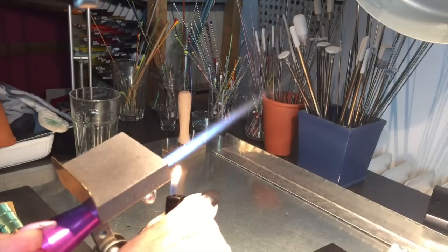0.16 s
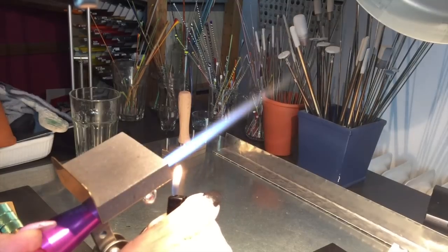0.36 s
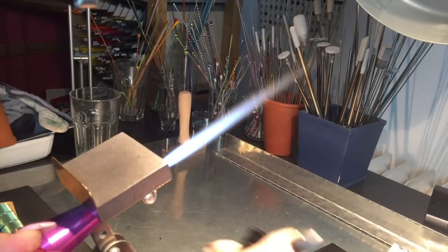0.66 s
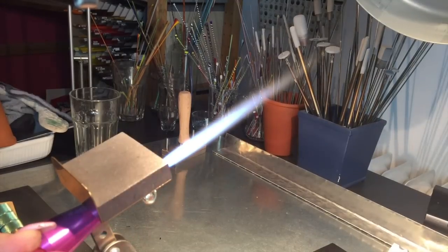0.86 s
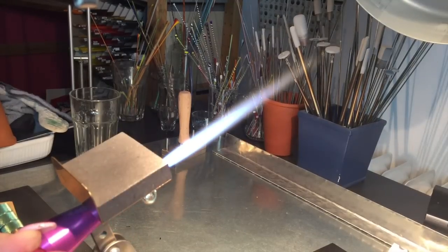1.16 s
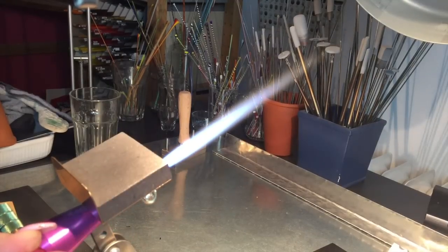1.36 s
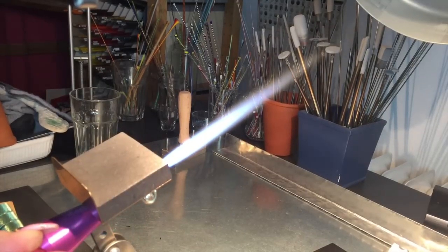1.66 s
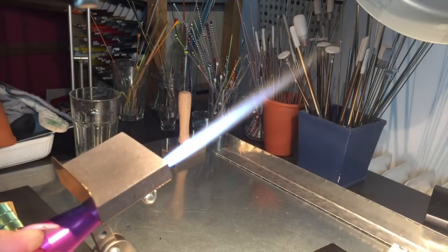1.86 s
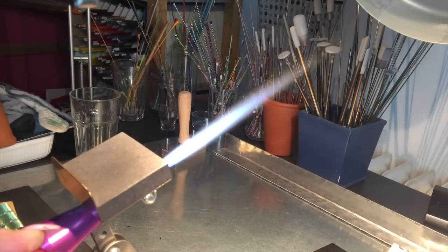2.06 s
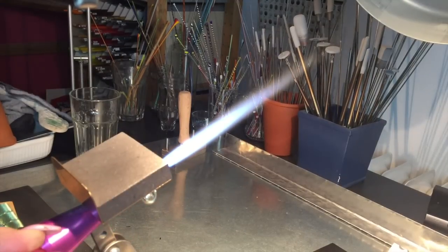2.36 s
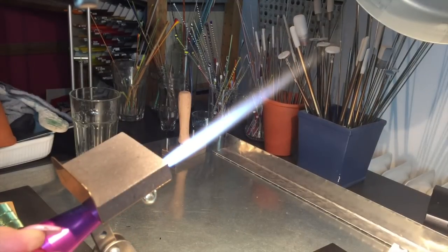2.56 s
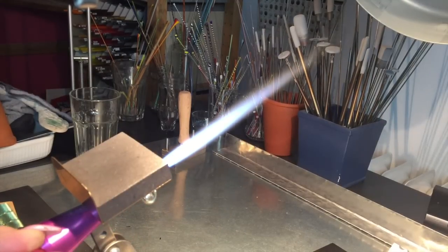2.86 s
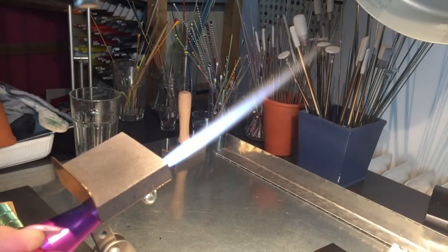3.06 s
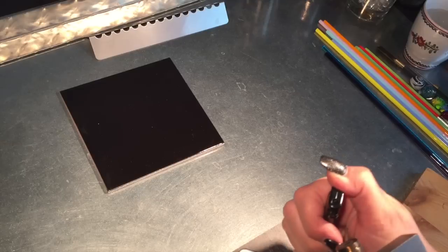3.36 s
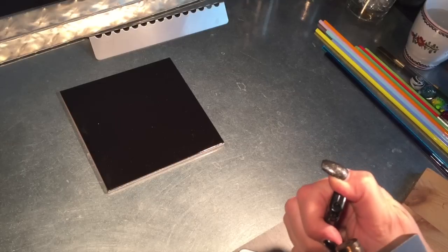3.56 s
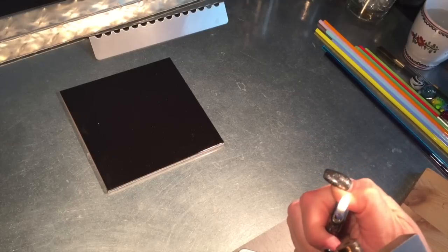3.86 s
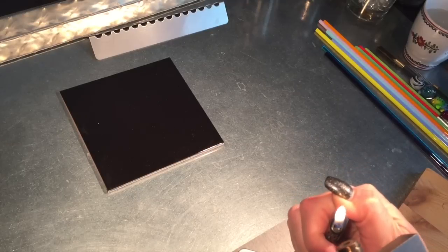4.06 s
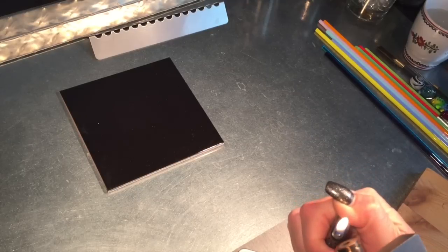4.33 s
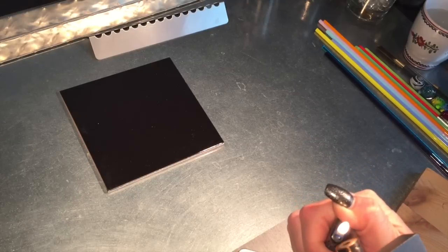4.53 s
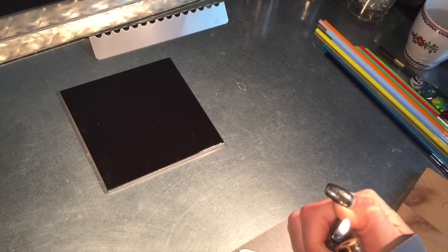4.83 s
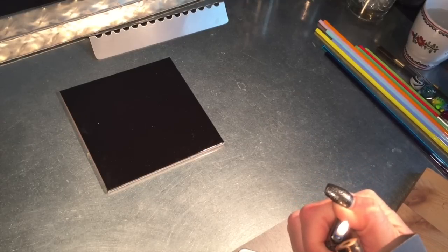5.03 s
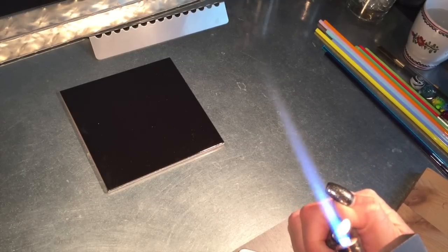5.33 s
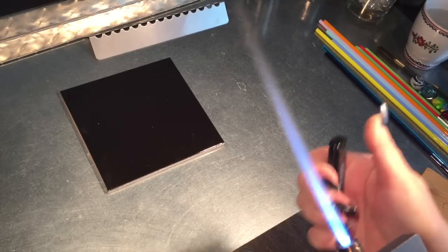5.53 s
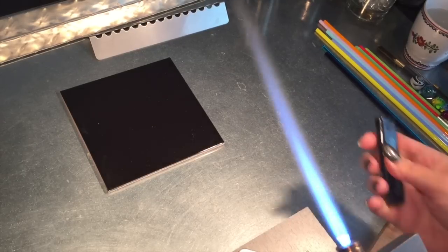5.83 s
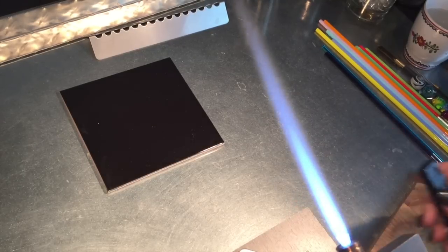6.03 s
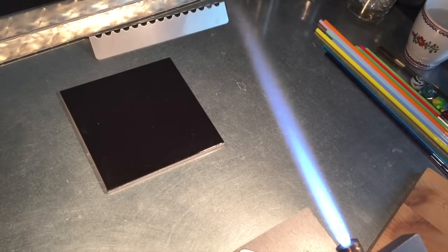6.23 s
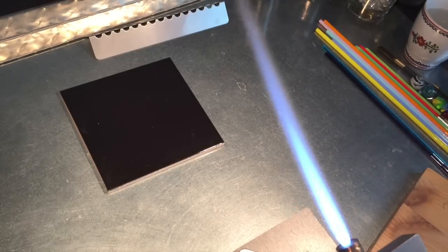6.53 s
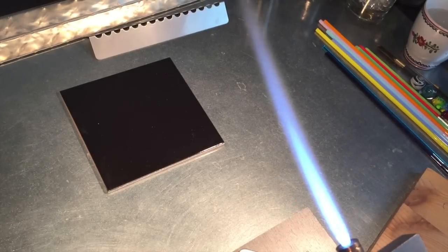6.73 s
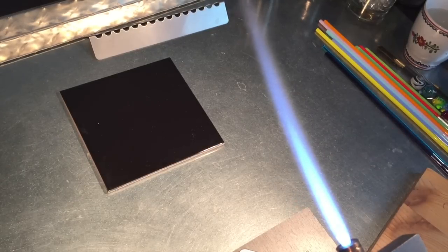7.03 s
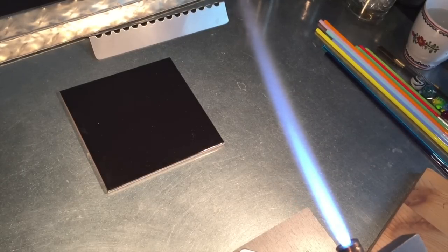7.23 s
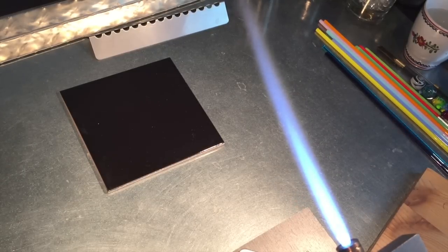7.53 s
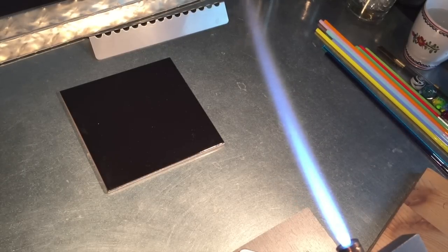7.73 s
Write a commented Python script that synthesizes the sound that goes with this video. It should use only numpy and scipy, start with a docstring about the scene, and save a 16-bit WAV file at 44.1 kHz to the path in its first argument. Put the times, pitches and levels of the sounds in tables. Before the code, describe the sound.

A gas torch catches with a short pop and burns with a quiet rush beside a workbench, an extractor fan humming throughout. The sound suddenly gets louder, heard from above the bench, with a thin hiss of gas. A pocket lighter snaps sharply, then the torch pops alight again and its rush grows. The volume dips after both noises and creeps back. The lighter scrapes briefly and clatters onto the metal bench.

```python
"""A bench gas torch is lit twice: its hissing jet catches with a pop and burns with a growing rush.
An extractor fan hums and blows throughout. The first lighting is heard quietly from beside the bench,
the second from above it. There a pocket lighter snaps, the torch pops alight, and the lighter slides
onto the metal bench and drops flat. In this second scene an automatic volume control turns the sound
down after each sharp noise and lets it creep back."""
import sys
import numpy as np
from scipy import signal
from scipy.fft import rfft, irfft, next_fast_len
from scipy.io import wavfile
from scipy.ndimage import uniform_filter1d, minimum_filter1d

SR = 44100
rng = np.random.default_rng(int(sys.argv[2]) if len(sys.argv) > 2 else 0)


def unload_wav(signal):
    """Save mono or channel-first audio to the path in sys.argv[1] as 16-bit WAV at rate SR, clipped to [-1, 1]."""
    wavfile.write(
        sys.argv[1],
        SR,
        np.round(np.clip(np.atleast_2d(signal).T, -1, 1) * 32767).astype(np.int16),
    )


N = 347799
TIME = np.arange(N) / SR
FFT_SIZE = next_fast_len(N, True)
FREQS = np.fft.rfftfreq(FFT_SIZE, 1 / SR)
SECOND_SCENE_S = 3.309  # from here on we listen from above the bench

# The two times the gas catches. Each row: start in seconds, energy in dB, treble tilt in dB per octave,
# the flame's run-up in seconds, run-up and echo levels in dB against the pop, then a dip in the echo:
# its pitch in Hz, width in Hz and depth in dB.
IGNITIONS = [(.1034, 30.5, 0, 0.0043, -25, -10.5, 7600, 600, -19.5),
             (5.2996, 33, 0.5, .0062, -21, -13, 6500, 1800, -12.5)]
# The lighter knocks on the bench. Each row: start in seconds, energy in dB, treble tilt in dB per
# octave, rattle time in seconds.
BENCH_KNOCKS = [(7.118, -7, 11, 0.0055), (7.128, 5, -4, 0.0046), (7.135, -4.5, 2.5, 0.0086)]
# The tone of the metal bench. Each row: frequency in Hz, relative level in dB.
BENCH_TONE = [(100, -30), (600, 0), (1100, -2), (1850, 4), (2300, -11), (3100, -3.5), (4300, -11),
              (5300, -13.5), (6400, -14), (7300, -18.5), (8500, -15), (11000, -22.5), (13000, -20),
              (16000, -35)]


def amp(db):
    """Turns decibels into a gain."""
    return 10 ** (np.asarray(db) / 20)


def unit(x):
    """Scales a sound to an energy of 1."""
    return x / np.sqrt(np.sum(x ** 2) + 1e-20)


def curve_at(points, hz):
    """Reads between the rows of a frequency table, on a scale of octaves."""
    row_hz, value = np.transpose(points)
    return np.interp(np.log(hz + 1), np.log(row_hz + 1), value)


def add(mix, start_s, sound):
    """Mixes a sound in at its start time."""
    part = mix[round(start_s * SR):][:len(sound)]
    part += sound[:len(part)]


def noise(db, ripple_db=1):
    """Noise with the given spectrum in dB per Hz; the room's reflections put ripples in its treble."""
    ripple = unit(uniform_filter1d(rng.standard_normal(len(FREQS)), size=350)) * np.sqrt(len(FREQS))
    treble_db = ripple_db * ripple * np.clip(FREQS / 2000 - .5, 0, 1)
    spectrum = rfft(rng.standard_normal(FFT_SIZE)) * amp(db + treble_db)
    return irfft(spectrum, FFT_SIZE)[:N] * np.sqrt(SR / 2)


def band(hz, width_hz):
    """Narrow noise with an average power of 1; around 0 Hz it is a random drift."""
    shape = 1 / (1 + (2 * (FREQS - hz) / width_hz) ** 2)
    return unit(irfft(rfft(rng.standard_normal(FFT_SIZE)) * shape, FFT_SIZE)[:N]) * np.sqrt(N)


def colour(x, tone, tilt_db, size=2048):
    """Gives a sound the tone of an object, tilted by tilt_db per octave above 1500 Hz."""
    hz = abs(np.fft.fftfreq(size, 1 / SR))
    log_gain = np.log(amp(curve_at(tone, hz) + tilt_db * np.log2(np.maximum(hz, 1500))))
    ring = np.fft.ifft(np.exp(np.conj(signal.hilbert(log_gain)))).real  # rings only after the hit
    return signal.fftconvolve(x, unit(ring[:size // 2]))


def hit(rattle_s, rattle_share):
    """One sharp push and a quickly dying rattle, which share an energy of 1."""
    t = np.arange(SR // 20) / SR
    push = np.sqrt(rattle_share) * unit(rng.standard_normal(len(t)) * np.exp(-t / rattle_s))
    push[0] = np.sqrt(1 - rattle_share)
    return push


def hollow(x, hz, width_hz, db):
    """Carves one dip into a sound's spectrum."""
    freqs = np.fft.rfftfreq(len(x), 1 / SR)
    return irfft(rfft(x) * amp(db * np.exp(-2 * ((freqs - hz) / width_hz) ** 2)), len(x))


def second_scene(fade_s=0.016):
    """Goes from 0 beside the bench to 1 above it."""
    return np.clip((TIME - SECOND_SCENE_S) / fade_s + .5, 0, 1)


def echo(x, build_s=0.00158):
    """The workshop's wash of reflections, whose highest treble dies first."""
    # How long the room rings. Each row: frequency in Hz, seconds to fade by 60 dB.
    fade_times = [(100, 0.28), (800, .38), (2000, 0.5), (4000, 0.41), (6000, 0.35), (10000, 0.29),
                  (16000, 0.19)]
    hz, t, spectra = signal.stft(rng.standard_normal(SR * 3 // 5), SR, nperseg=256)
    fade = amp(-60 * t / curve_at(fade_times, hz)[:, None])
    tail = signal.istft(spectra * fade, SR, nperseg=256)[1]
    build_up = 1 - np.exp(-np.arange(len(tail)) / SR / build_s)
    return signal.fftconvolve(x, unit(tail * build_up))


def with_echo(x, echo_db):
    """A sound together with its echo."""
    out = amp(echo_db) * echo(x)
    add(out, 0, x)
    return out


def hit_echo(tone, tilt_db):
    """The room hears a hit from all sides, so its echo has only the object's smooth tone; energy 1."""
    return unit(echo(colour(np.ones(1), tone, tilt_db)))


def resonances_db():
    """Standing waves in the duct and room lift some frequencies and weaken others."""
    # The peaks and dips. Each row: frequency in Hz, width in Hz, height in dB.
    peaks = [(121.7, 15.3, 8.5), (149.5, 9.2, -7), (161.4, 17, 2.5), (200.5, 6.1, 5), (251, 26.2, 10),
             (298, 21, -2), (355.8, 19.5, 5.5), (396, 16, 2), (459.4, 28, 8), (490, 18, -4.5), (547, 43, 4),
             (641.4, 70, 6.5), (868, 17, 7.5), (970, 63, -0.5), (1330, 40, 3), (1454, 52, -2.5),
             (1472, 17, 11), (1617, 22, 5.5), (2000, 27, 0), (2190, 50, 2.5), (2340, 43, 6),
             (2380, 45, -14), (2630, 50, -10.5), (2694, 41, 13), (3150, 34, 6.5), (3320, 54, -9.5),
             (3770, 80, 7), (4350, 100, 9.5)]
    return sum(db * np.exp(-2 * ((FREQS - hz) / width) ** 2) for hz, width, db in peaks)


def fan(waver_hz=1.48, flutter=0.33, swell_db=.5):
    """Swirling air rumbles in the extractor's duct while the motor hums in wavering tones."""
    # The air's rumble beside and above the bench. Each row: frequency in Hz, base level in dB per Hz.
    rumble_beside = [(20, -94.5), (45, -71.5), (65, -65), (120, -58), (200, -53.5), (255, -58.5),
                     (305, -52), (365, -60.5), (410, -71), (520, -84.5), (830, -64.5), (1200, -78.5),
                     (1800, -72), (2400, -88), (6000, -115)]
    rumble_above = [(20, -82), (48, -71.5), (68, -61.5), (110, -57), (210, -56), (310, -60), (500, -69),
                    (680, -66.5), (950, -76.5), (1180, -70), (1420, -79), (1780, -72), (2000, -84),
                    (6000, -112)]
    # The motor's hum. Each row: pitch in Hz, level in dB beside the bench, level in dB above it.
    motor_tones = [(121.8, -50, -65), (361.2, -65.5, -50), (670.4, -58, -48.5), (1633, -59, -53),
                   (1740, -55.5, -51), (1820, -51, -59)]
    duct_db, above = resonances_db(), second_scene()
    air = (1 - above) * noise(curve_at(rumble_beside, FREQS) + duct_db)
    air += above * noise(curve_at(rumble_above, FREQS) + duct_db)
    out = air * amp(swell_db * band(0, 22))
    for hz, beside_db, above_db in motor_tones:
        level = ((1 - above) * amp(beside_db) + above * amp(above_db)) * (1 + flutter * band(0, 38))
        phase = 2 * np.pi * np.cumsum(hz + waver_hz * band(0, 5.94)) / SR
        out += np.sqrt(2) * level * np.sin(phase)
    return out


def metal_rings():
    """Metal rings on after the first pop and after the lighter's snap, touch on the bench and fall."""
    # The dying tones. Each row: start in seconds, pitch in Hz, peak in dB, seconds to fade by 60 dB.
    tones = [(0.105, 1435, -15.5, 0.3), (3.752, 5652, -29.5, 0.34), (3.752, 8250, -29, .25),
             (6.92, 4300, -31.5, 0.012), (7.128, 1856, -29, 0.51), (7.127, 3500, -33, .07)]
    out, t = np.zeros(N), np.arange(SR // 3) / SR
    for start_s, hz, db, fade_s in tones:
        add(out, start_s, amp(db - 60 * t / fade_s) * np.sin(2 * np.pi * hz * t))
    return out


def lighter_drag(start_s=6.972, swell_s=0.01, stop_s=0.029, level_db=-39, clump_db=3, slips_per_s=1800):
    """The lighter skips over the sheet metal in clumps of tiny rasping slips, until the last knock."""
    # Resonances the dragging stirs. Each row: pitch in Hz, width in Hz, level in dB against the drag.
    rasp_bands = [(4330, 1000, -15.5), (6250, 700, -21), (8300, 300, -26), (12750, 1000, -25)]
    speed = np.clip((TIME - start_s) / swell_s, 0, 1)
    speed *= np.clip(1 - (TIME - BENCH_KNOCKS[-1][0]) / stop_s, 0, 1)
    force = amp(level_db + clump_db * band(0, 160)) * speed
    slips = unit(rng.standard_normal(N) * (rng.random(N) < slips_per_s / SR)) * np.sqrt(N)
    rasp = sum(amp(db) * band(hz, width) for hz, width, db in rasp_bands)
    scrape = colour(slips * force, BENCH_TONE, tilt_db=-3.5)[:N]
    return with_echo(scrape + rasp * force, echo_db=-4)[:N]


def lighter_fall(echo_db=-4):
    """The lighter falls on its side and bounces on the sheet metal."""
    out = np.zeros(N)
    for start_s, db, tilt_db, rattle_s in BENCH_KNOCKS:
        knock = colour(hit(rattle_s, rattle_share=0.78), BENCH_TONE, tilt_db)
        add(out, start_s, amp(db) * unit(knock))
        add(out, start_s, amp(db + echo_db) * hit_echo(BENCH_TONE, tilt_db))
    return out


def lighter_in_hand():
    """Snaps and finger rubs make the lighter's small plastic body ring."""
    # The tone of that body. Each row: frequency in Hz, relative level in dB.
    plastic_tone = [(100, -10), (600, -3), (1200, -6), (1900, -3.5), (2900, 7.5), (3600, -2), (4300, 0),
                    (5100, 0), (5700, 5), (6800, -2), (10000, -7), (11700, -4.5), (13000, -10.5),
                    (16000, -9.5)]
    # The lighter snaps, is let go and is handled. Each row: start in seconds, energy in dB, treble tilt
    # in dB per octave, rattle time in seconds, echo level in dB against the click.
    clicks = [(3.7476, -17, 3, .0005, -12), (3.7509, 32, 5.5, 0.0013, -18.5), (5.515, -14, -8, 0.0024, 0),
              (5.5374, -8, -1, 0.004, -8), (5.988, -21.5, -1, .006, -6), (6.135, -25, 4, .003, -6)]
    # Finger rubs. Each row: start and length in seconds, level in dB, treble tilt in dB per octave.
    rubs = [(3.519, 0.015, -41, 9), (3.722, 0.016, -47, 2), (6.384, 0.014, -50, 0),
            (6.552, 0.024, -47.5, 9), (6.652, .016, -56, 4), (6.736, 0.025, -55, 4),
            (6.91, 0.022, -48, -10)]
    out = np.zeros(N)
    for start_s, db, tilt_db, rattle_s, echo_db in clicks:
        click = colour(hit(rattle_s, rattle_share=0.86), plastic_tone, tilt_db)
        add(out, start_s, amp(db) * unit(click))
        add(out, start_s, amp(db + echo_db) * hit_echo(plastic_tone, tilt_db))
    for start_s, length_s, db, tilt_db in rubs:
        count = round(length_s * SR)
        grains = rng.standard_normal(count) * rng.exponential(1, count) * signal.windows.tukey(count, .4)
        rub = colour(unit(grains), plastic_tone, tilt_db)
        add(out, start_s, amp(db) * np.sqrt(count) * with_echo(rub, echo_db=-6.5))
    return out


def lighter_puff(start_s=3.7535, hz=78, db=-1, decay_s=0.0067):
    """The lighter's own gas catches with a short low thump."""
    out, t = np.zeros(N), np.arange(SR // 8) / SR
    add(out, start_s, -amp(db) * np.sin(2 * np.pi * hz * t) * np.exp(-t / decay_s))
    return out


def burning(lit_s, catch_s=.04):
    """Rises to 1 as a flame takes hold and stays there until its scene ends."""
    in_scene = second_scene() if lit_s > SECOND_SCENE_S else 1 - second_scene()
    return in_scene * np.clip((TIME - lit_s) / catch_s, 0, 1)


def gas_jet(beside_db=-75, above_db=-62, lit_db=-4, flicker_db=2, whine_hz=14260, whine_db=-74.5):
    """The jet hisses and whistles on the nozzle's edge; the whistles are louder above, softer when lit."""
    # The hiss of escaping gas. Each row: frequency in Hz, level in dB per Hz.
    hiss = [(500, -100), (2000, -88.5), (2700, -84), (3800, -91), (5000, -99), (6200, -99), (7600, -103),
            (8300, -95), (9200, -102), (10500, -106), (11000, -103), (11600, -105), (16000, -107)]
    # The nozzle's unsteady whistles. Each row: pitch in Hz, width in Hz, relative level in dB.
    edge_tones = [(9887, 260, 1.5), (8380, 220, -9.5)]
    above, lit = second_scene(), [burning(lit_s) for lit_s, *_ in IGNITIONS]
    whistle_db = (1 - above) * beside_db + above * above_db + lit_db * sum(lit)
    whistles = sum(amp(db) * band(hz, width) for hz, width, db in edge_tones)
    whistles *= amp(whistle_db + flicker_db * band(0, 25))
    whine_phase = 2 * np.pi * np.cumsum(whine_hz + 12 * band(0, 20)) / SR  # wavers by about 12 Hz
    whine = amp(whine_db) * np.sqrt(2) * np.sin(whine_phase)
    whine *= 1 - lit[-1]  # the last lighting stops the jet's thin whine
    return noise(curve_at(hiss, FREQS)) + whistles + whine


def torch_pops(bounce_s=0.004, bounce_db=-13):
    """The flame runs up to the nozzle and bursts; the bench top and the room throw the crack back."""
    # The tones of the pop and of its run-up. Each row: frequency in Hz, relative level in dB.
    pop_tone = [(25, -52.5), (90, -3), (330, -3.5), (500, -6.5), (780, -0.5), (1050, -5), (1550, 0),
                (2100, -10.5), (3000, -8.5), (4300, -8), (5150, -18.5), (6300, -16), (8800, -17.5),
                (11000, -26.5)]
    run_up_tone = [(300, -12.0), (1500, -1.5), (8000, -24.0)]
    out = np.zeros(N)
    for start_s, db, tilt_db, run_s, run_db, echo_db, dip_hz, dip_width_hz, dip_db in IGNITIONS:
        push = np.zeros(SR // 10)
        count = round(run_s * SR)
        run_up = rng.standard_normal(count) * np.linspace(.3, 1, count) ** 2
        add(push, 0, amp(run_db) * unit(colour(run_up, run_up_tone, tilt_db=0)))
        burst = hit(rattle_s=0.001, rattle_share=0.35)
        add(push, run_s, burst + amp(-6.5) * hit(rattle_s=0.0044, rattle_share=0.89))
        add(push, run_s + bounce_s, amp(bounce_db) * burst)
        add(out, start_s - run_s, amp(db) * unit(colour(push, pop_tone, tilt_db)))
        tail = hollow(hit_echo(pop_tone, tilt_db), dip_hz, dip_width_hz, dip_db)
        add(out, start_s, amp(db + echo_db) * tail)
    return out


def flame_strength():
    """Each flame catches at its pop, then grows ever more slowly to its full rush."""
    # The two flames. Each row: full strength in dB, how many dB weaker it starts, growth time in seconds.
    growth = [(-5, 5, .4), (-0.5, 9.5, .7)]
    out = np.zeros(N)
    for (lit_s, *_), (full_db, weaker_db, grow_s) in zip(IGNITIONS, growth):
        age_s = np.maximum(TIME - lit_s, 0)
        out += burning(lit_s) * amp(full_db - weaker_db * np.exp(-age_s / grow_s))
    return out


def torch_flame(flicker_db=1.85, room_share=0.64, sing_hz=2695):
    """Burning gas rushes and flickers; the first flame also sings in brief faint whistles."""
    # The flame's rush. Each row: frequency in Hz, base level in dB per Hz.
    rush_spectrum = [(30, -93), (80, -58.5), (250, -71.5), (500, -69), (800, -68.5), (1250, -67),
                     (1750, -71), (2000, -80), (2350, -75), (3000, -88), (4000, -102), (5000, -95.5),
                     (8000, -102), (16000, -110)]
    # The brief whistles. Each row: start in seconds, length in seconds, level in dB.
    whistles = [(0.552, 0.046, -47), (.88, .06, -52), (1.822, 0.082, -52)]
    rush = noise(curve_at(rush_spectrum, FREQS) + room_share * resonances_db())
    out = rush * flame_strength() * amp(flicker_db * band(0, 39))
    for start_s, length_s, db in whistles:
        t = np.arange(round(length_s * SR)) / SR
        tone = np.sqrt(2) * np.sin(2 * np.pi * sing_hz * t)
        add(out, start_s, amp(db) * tone * signal.windows.tukey(len(t), .5))
    return out


def scene():
    """The fan, the torch and the lighter together in one channel."""
    fan_and_torch = fan() + gas_jet() + torch_flame() + torch_pops()
    lighter = lighter_in_hand() + lighter_puff() + lighter_drag() + lighter_fall()
    return (fan_and_torch + lighter + metal_rings())[None]


def volume_control(x, threshold_db=-26, slope=0.49, hold_s=0.17, release_s=0.37):
    """Loud treble pulls the gain down at once; it holds, then creeps back."""
    treble = signal.sosfilt(signal.butter(2, 1000, "high", fs=SR, output="sos"), x)
    power_db = 10 * np.log10(abs(uniform_filter1d(treble ** 2, size=90)) + 1e-12)
    gain = amp(-slope * np.maximum(power_db - threshold_db, 0))
    half_hold = round(hold_s * SR / 2)
    held = minimum_filter1d(gain, 2 * half_hold + 1, origin=half_hold, mode="nearest")
    fade = np.exp(-TIME / release_s)
    dip = np.maximum.accumulate((1 - held) / fade) * fade  # each dip fades until a deeper one comes
    return uniform_filter1d(1 - dip, size=30)


def record(dry, low_gain_db=-19, low_cut_hz=32, high_cut_hz=15900, ceiling=.62):
    """A low steady gain, then automatic volume; trims deep bass and top treble and rounds off peaks."""
    above = second_scene()
    gain = (1 - above) * amp(low_gain_db) + above * volume_control(dry[0] * above)
    trimmed = signal.sosfilt(signal.butter(2, low_cut_hz, "high", fs=SR, output="sos"), dry)
    rounded = ceiling * np.tanh(trimmed * gain / ceiling)
    low_pass = signal.firwin(511, high_cut_hz, window=("kaiser", 9), fs=SR)
    return signal.oaconvolve(rounded, low_pass[None], "same")


dry = scene()
out = record(dry)
unload_wav(out)
```